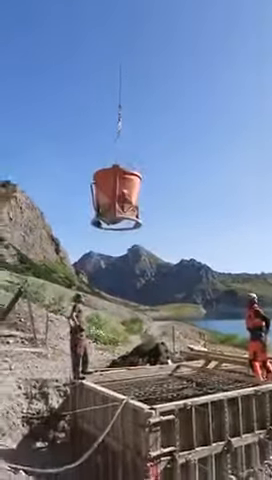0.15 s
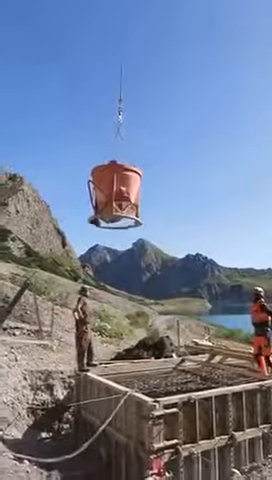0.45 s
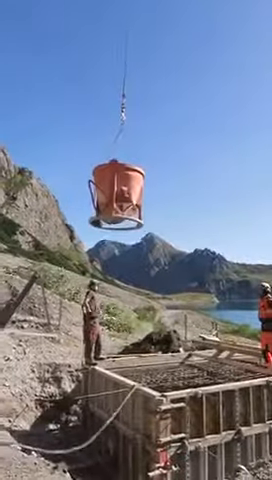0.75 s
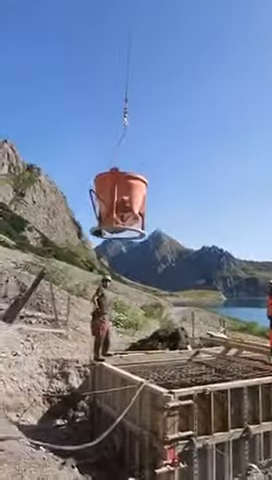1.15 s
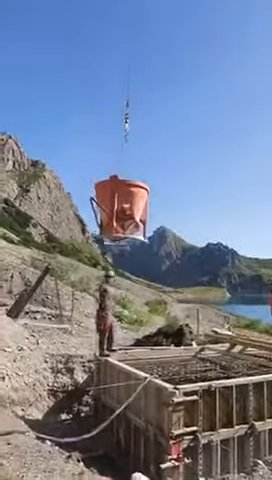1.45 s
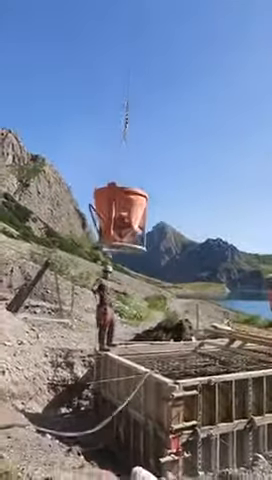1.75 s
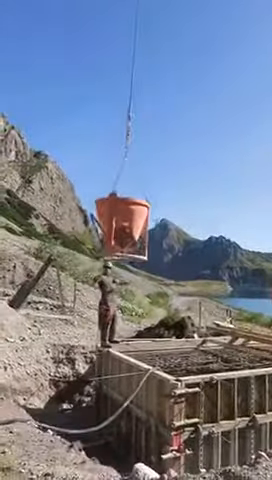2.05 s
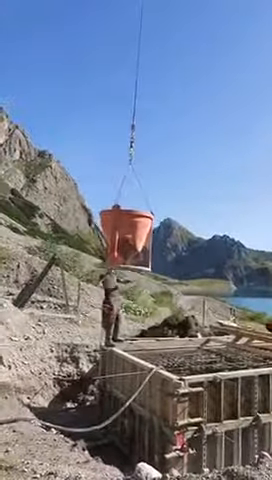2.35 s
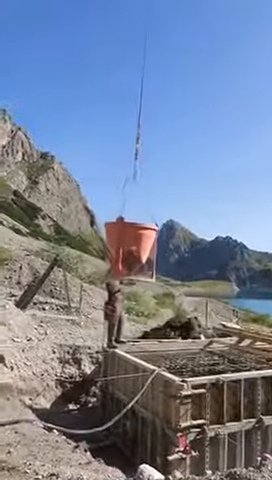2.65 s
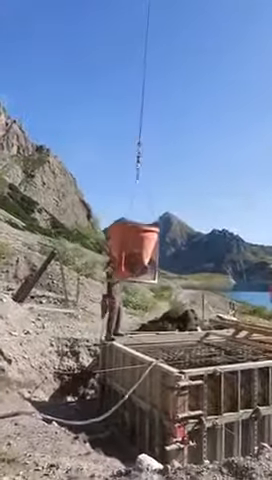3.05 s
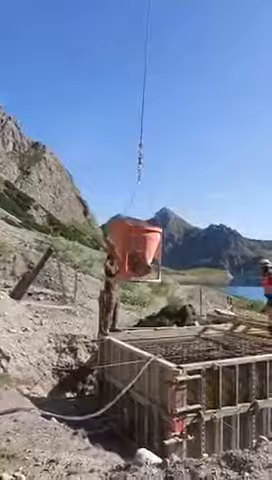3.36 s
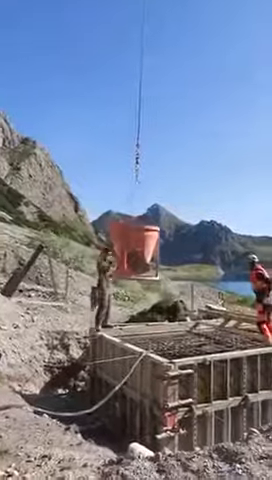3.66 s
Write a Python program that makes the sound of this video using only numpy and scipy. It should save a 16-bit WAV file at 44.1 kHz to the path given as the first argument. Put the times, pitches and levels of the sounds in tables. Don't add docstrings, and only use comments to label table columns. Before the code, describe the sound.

A helicopter hovers above an open mountain slope, its rapid grainy blade slaps, about twenty a second, riding a steady roar with faint turbine hiss. A dense wind blast covers the first 0.2 s, then low wide buffeting until 0.67 s, when the bass narrows. The rotor dips around 0.3-1 s, then swells. Thuds, rustle and short puffs peak at 2.2-2.65 s; deep, loud chopping follows, with another puff near 3.6 s.

```python
import sys
import numpy as np
from scipy import signal
from scipy.fft import rfft, irfft, next_fast_len
from scipy.io import wavfile
from scipy.ndimage import map_coordinates

SR = 44100
rng = np.random.default_rng(int(sys.argv[2]) if len(sys.argv) > 2 else 0)


def invert_db(x):
    u = np.asarray(x, float) / 20
    return 10 ** u


def inscribe(sig):
    pcm = np.round(np.clip(np.atleast_2d(sig).T, -1, 1) * 32767)
    wavfile.write(sys.argv[1], SR, pcm.astype(np.int16))


N = 167139
TICK_S = np.arange(0, N + 32, 32) / SR
WIND_FILTER_S, WIND_FILTER_FADE_S = .668, 0.0066

# time in seconds, level in dB, slap depth in dB.
ROTOR_LEVEL = [(0, -16.5, 6), (.15, -19.5, 6.5), (.27, -25.5, 3.5), (.45, -25, 8), (.72, -26, 8.5),
               (.95, -25, 10.5), (1.2, -22.5, 12), (1.45, -21, 12.5), (1.65, -22.5, 7.5), (1.9, -22.5, 9.5),
               (2.2, -19.5, 4.5), (2.38, -21.5, 4), (2.5, -16, 5.5), (2.68, -18.5, 16.5),
               (2.9, -17.5, 11.5), (3.15, -16, 10), (3.4, -18.5, 17), (3.79, -18, 9.5)]
# frequency in Hz, density in dB per Hz.
THUD_SPECTRUM = [(18, -72.5), (30, -29), (130, -15), (233, -8.5), (292, -5), (429, -3), (649, -13),
                 (900, -16), (1170, -32), (1980, -120)]


def unit(x):
    return x / np.sqrt(np.mean(x ** 2))


def fine(control):
    return np.interp(np.arange(N) / SR, TICK_S, control)


def curve(table, col):
    rows = np.array(table)
    return np.interp(TICK_S, rows[:, 0], rows[:, col])


def level(table, col):
    return fine(invert_db(curve(table, col)))


def walk(rate_hz):
    return map_coordinates(rng.standard_normal(1300), [TICK_S * min(rate_hz, 330)], order=3)


def shape(x, table):
    size, rows = next_fast_len(N), np.array(table)
    log_hz = np.log(np.fft.rfftfreq(size, 1 / SR) + 1)
    gain_db = np.interp(log_hz, np.log(rows[:, 0] + 1), rows[:, 1])
    return irfft(rfft(x, size) * invert_db(gain_db), size)[:N]


def colour(x, table):
    return unit(shape(x, table))


def eddies(depth_db, rate_hz):
    return unit(rng.standard_normal(N) * fine(invert_db(depth_db * walk(rate_hz))))


def patchy(gain_db, count=18):
    out = 0
    for hz in 31 * 2 ** (np.arange(count) / 2):
        band = signal.butter(2, [hz / 2 ** .25, hz * 2 ** .25], "band", fs=SR, output="sos")
        out = out + signal.sosfilt(band, rng.standard_normal(N)) * fine(invert_db(gain_db(hz)))
    return out


def echo(x, late_s):
    return map_coordinates(x, [np.arange(N) - late_s * SR], order=1, mode="mirror")


def first_blast():
    end_s, fade_s = 0.216, 0.037
    fade = np.clip((end_s - TICK_S) / fade_s + .5, 0, 1)
    return invert_db(-17.5) * fine(fade) * colour(patchy(lambda hz: 1.6 * walk(25), count=12), THUD_SPECTRUM)


def buffet():
    # time in seconds, common level in dB, left-right level in dB.
    wind_level = [(0, -34, -34), (.13, -37, -30), (.16, -24.5, -20), (.2, -23.5, -14.5), (.29, -22, -14),
                  (.31, -24.5, -22), (.4, -25, -19.5), (.47, -25.5, -18), (.55, -23, -14), (.6, -23, -14),
                  (.66, -23.5, -19)]
    # frequency in Hz, density in dB per Hz.
    common_spectrum = [(12, -53), (20, -7.5), (252, -6.5), (357, -11.5), (409, -18.5), (500, -4),
                       (650, -38), (1100, -120)]
    apart_spectrum = [(12, -61), (20, -37.5), (147, -1.5), (281, -4), (464, -8), (549, -15.5), (649, -15.5),
                      (3000, -40), (3900, -77.5), (6600, -120)]
    shake = walk(25)

    def rumble(table):
        return colour(patchy(lambda hz: 2.0 * shake + 1.5 * walk(20.3), count=14), table)

    mid = rumble(common_spectrum) * level(wind_level, col=1)
    side = rumble(apart_spectrum) * level(wind_level, col=2)
    return np.array([mid, side])


def gusts():
    # time in seconds, thud level in dB, rustle level in dB.
    gust_level = [(.68, -55, -52), (1.04, -37, -54), (1.08, -30, -41.5), (1.16, -33.5, -42),
                  (1.2, -33, -45), (1.3, -27.5, -39.5), (1.5, -27, -37.5), (1.86, -25, -40),
                  (2.03, -23, -35.5), (2.2, -20, -33), (2.29, -22, -33), (2.36, -27.5, -37.5),
                  (2.41, -26, -34.5), (2.45, -19, -32.5), (2.53, -18.5, -31), (2.59, -25, -34),
                  (2.64, -24, -30), (2.68, -28.5, -42.5), (3.2, -32.5, -44.5), (3.58, -25.5, -44.5),
                  (3.62, -30.5, -33), (3.67, -24.5, -42), (3.79, -29.5, -37)]
    # frequency in Hz, density in dB per Hz.
    rustle_spectrum = [(120, -54), (200, -23.5), (372, -4.5), (774, -5.5), (839, -18), (968, -4.5),
                       (1770, -6.5), (9000, -20.5), (11700, -37), (19800, -120)]
    # frequency in Hz, gain in dB.
    rustle_common = [(300, 5.5), (2000, 3), (5000, -1), (9000, -5.5), (12000, -7.5)]
    # time in seconds, level in dB, length in seconds.
    puff_times = [
        (1.074, -39.5, 0.0052),
        (1.218, -34, 0.0066),
        (1.412, -37, 0.013),
        (2.186, -36, 0.007),
        (2.522, -28, .009),
        (2.56, -25, 0.0046),
        (2.592, -36, .006),
        (2.637, -26.5, .011),
        (3.625, -30, 0.011),
    ]
    # frequency in Hz, density in dB per Hz.
    puff_spectrum = [(500, -35), (1200, 3.5), (2500, 3.5), (5000, -13), (9000, -33.5), (12000, -43)]
    swirl = walk(40)

    def rustle():
        flutter = patchy(lambda hz: 1.2 * swirl + 2.4 * walk(45))
        return colour(flutter, rustle_spectrum) * level(gust_level, col=2)

    blow = fine(sum(invert_db(db) * np.exp(-((TICK_S - s) / long_s) ** 2) for s, db, long_s in puff_times))

    def puffs():
        return blow * colour(eddies(2.3, 300), puff_spectrum)

    thud = colour(patchy(lambda hz: 1.5 * swirl + 2.0 * walk(18), count=12), THUD_SPECTRUM)
    thud = thud * level(gust_level, col=1)
    mid = thud + shape(rustle(), rustle_common) + invert_db(4.5) * puffs()
    side = rustle() + puffs()
    return np.array([mid, side])


def ring(x):
    # frequency in Hz, width in Hz, lift in dB.
    ring_bands = [(677, 150, 2.5), (1155, 150, 6.5), (1695, 110, 5), (2177, 130, 4.5), (3350, 220, 3)]
    # time in seconds, share of the lift.
    ring_share = [(0, 0.83), (.7, 1.3), (1.45, 1.44), (1.75, 1.2), (2.0, .6), (2.55, .5), (2.8, 1.43),
                  (3.3, 1.02), (3.79, 0.83)]
    lift = 0
    for hz, width_hz, db in ring_bands:
        lift = lift + (invert_db(db) - 1) * signal.lfilter(*signal.iirpeak(hz, hz / width_hz, SR), x)
    return x + fine(curve(ring_share, col=1)) * lift


def blades(turn, share, size_db):
    sharpness, skew = 1.66, 0.22
    angle = 2 * np.pi * turn
    swell = .5 + .5 * np.tanh(sharpness * np.cos(angle - skew * (1 - np.cos(angle))))
    depth_db = share * np.maximum(curve(ROTOR_LEVEL, col=2), 0)
    blade = np.floor(turn + .5).astype(int) + 2
    return swell * (depth_db + size_db[blade]) - 0.72 * depth_db


def helicopter():
    # time in seconds, lag in turns.
    blade_lag = [(0, 0.28), (.9, 0.23), (1.65, 0.083), (2.15, 0.086), (2.9, 0.19), (3.3, 0.049), (3.55, .1),
                 (3.79, 0.028)]
    # time in seconds, change in dB.
    accents = [(.065, 2.5), (.12, -0.5), (.37, -0.5), (.47, 1), (.52, 2), (.57, -2.5), (.62, 3.5), (.77, 3),
               (.97, 4), (1.02, 2), (1.07, -3), (1.13, 1.5), (1.18, 0.5), (1.22, 3.5), (1.28, -4),
               (1.32, 2.5), (1.38, 1.5), (1.42, 5), (1.52, 4.5), (1.57, 5), (1.67, 3.5), (1.73, -1),
               (1.93, 2.5), (1.98, 0.5), (2.03, 2.5), (2.48, 1.5), (2.59, -1), (2.69, -2), (2.745, 1),
               (2.79, 1.5), (2.845, 0), (2.9, 0.5), (2.945, 4.5), (2.995, 1), (3.1, -2), (3.195, 0.5),
               (3.245, -4), (3.3, -1), (3.35, -3.5), (3.45, 1), (3.55, 2), (3.6, 4.5), (3.655, 0),
               (3.75, -1.5)]
    # frequency in Hz, density in dB per Hz.
    slap_spectrum = [(24, -83.5), (40, -38.5), (348, -6), (687, -1.5), (869, -10), (2230, -17.5),
                     (7730, -49), (9200, -57.5), (11000, -77), (14300, -106), (22000, -120)]
    roar_spectrum = [(24, -58), (40, -37.5), (356, -4), (1150, -16.5), (4400, -34), (7550, -48),
                     (9200, -73), (11000, -106), (14300, -136), (22000, -120)]
    wide_spectrum = [(180, -101), (300, -74.5), (459, -23.5), (551, -33), (661, -13), (1350, -21),
                     (2930, 6), (7870, -6), (11300, -7.5), (14700, -42), (22000, -120)]
    whine_spectrum = [(3000, -28.5), (5500, -0.5), (8000, -14.5), (11000, 4), (12000, -35.5)]
    # frequency in Hz, gain in dB.
    lean = [(800, -48), (2200, -24), (4500, -13), (7000, -10), (11000, -30)]
    blade_hz, jitter_turns, patch_jitter_turns = 19.75, 0.015, .04
    scatter_db, patch_db, depth_loss_per_octave = .2, 1.1, 0.056
    eddy_db, eddy_hz, crackle_db_per_octave = 3.5, 150, 1.3
    ground_s, ground_db, ground_hz = .0086, -10, 2500

    turn = blade_hz * TICK_S - curve(blade_lag, col=1) + jitter_turns * walk(12)
    size_db = scatter_db * rng.standard_normal(128)
    lumps = walk(eddy_hz)
    for s, db in accents:
        size_db[int(np.interp(s, TICK_S, turn) + 2.5)] += db

    def slap_db(hz, deep):
        share = deep - depth_loss_per_octave * abs(np.log2(hz / 1000))
        patch_size_db = size_db + patch_db * rng.standard_normal(128)
        return blades(turn + patch_jitter_turns * walk(15), share, patch_size_db)

    def grainy_slap_db(hz):
        grain_db = eddy_db * (0.61 * lumps + 0.59 * walk(.7 * eddy_hz))
        crackle_db = crackle_db_per_octave * np.clip(np.log2(hz / 600), 0, 2) * walk(90)
        return slap_db(hz, 0.85) + grain_db + crackle_db

    slaps = colour(patchy(grainy_slap_db), slap_spectrum)
    roar = colour(patchy(lambda hz: 1.3 * walk(8)), roar_spectrum)
    air = slaps + invert_db(-6.5) * roar
    dull = signal.lfilter(*signal.butter(1, ground_hz, fs=SR), air)
    ground = invert_db(ground_db) * echo(dull, ground_s + 0.00014 * fine(walk(1.45)))
    mid = unit(ring(air + ground))

    wide = colour(patchy(lambda hz: slap_db(hz, .7) + 1.8 * walk(40)), wide_spectrum)
    whine = colour(eddies(1.2, 8), whine_spectrum)
    side = invert_db(-26.5) * wide + invert_db(-33.5) * whine - echo(shape(mid, lean), .00002)
    return level(ROTOR_LEVEL, col=1) * np.array([mid, side])


def scene():
    # frequency in Hz, gain in dB.
    bass_fold = [(20, -40), (250, -9), (700, -4), (1400, 0), (20000, 0)]
    shut = np.clip((np.arange(N) / SR - WIND_FILTER_S) / WIND_FILTER_FADE_S, 0, 1)
    mid, side = helicopter() + (1 - shut) * buffet() + shut * gusts()
    mid = mid + first_blast()
    side = side + shut * (shape(shut * side, bass_fold) - side)
    return np.array([mid + side, mid - side])


def twinkle(x, table):
    cell_s, cell_hz = .035, 260
    shut_db, flicker_db, open_bass_hz = -30, 1.5, 1500
    hz, s, cells = signal.stft(x, SR, nperseg=1024, noverlap=768)
    places = np.meshgrid(hz / cell_hz, s / cell_s, indexing="ij")
    chance = map_coordinates(rng.standard_normal((90, 120)), places, order=1)
    chance = chance / chance.std()
    threshold = np.interp(hz, *np.array(table).T)[:, None]
    shut = np.clip(3 * (threshold - chance), 0, 1)
    shut = shut * ~((hz[:, None] < open_bass_hz) & (s < WIND_FILTER_S))
    flicker = flicker_db * chance * np.clip(hz[:, None] / open_bass_hz - 1, 0, 1)
    gain = invert_db(shut_db * shut + flicker)
    return signal.istft(cells * gain, SR, nperseg=1024, noverlap=768)[1][:N]


def top_cut(x):
    return signal.sosfilt(signal.butter(12, 11480, fs=SR, output="sos"), x)


def record(dry):
    # frequency in Hz, gain in dB.
    common_top = [(20, 0.5), (6000, 0), (8300, 0), (9300, -2.5), (11000, 6.5)]
    # frequency in Hz, shuts under this many spreads.
    mid_threshold = [(3000, -4), (4500, -2.2), (6000, -1.5), (7500, -1.1), (8500, 0), (9500, 1),
                     (11000, 1.4)]
    side_threshold = [(300, .2), (1200, -.5), (2500, -1.1), (4500, -1.7), (7000, -2.2), (9000, -1.6),
                      (11300, -.9)]
    left, right = np.tanh(0.81 * dry) / 0.79
    mid = twinkle(shape((left + right) / 2, common_top), mid_threshold)
    side = twinkle((left - right) / 2, side_threshold)
    return top_cut(np.array([mid + side, mid - side]))


dry = scene()
out = record(dry)
inscribe(out)
```